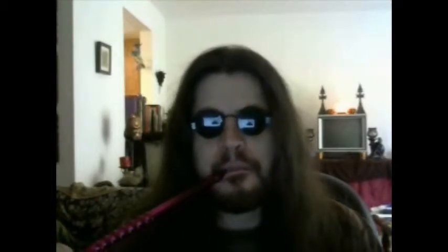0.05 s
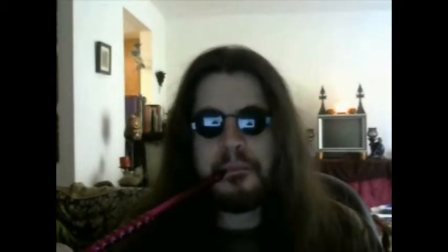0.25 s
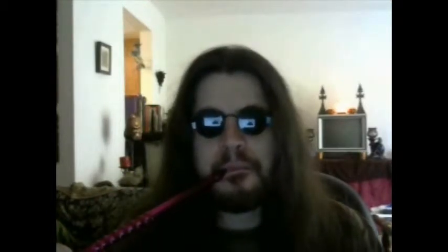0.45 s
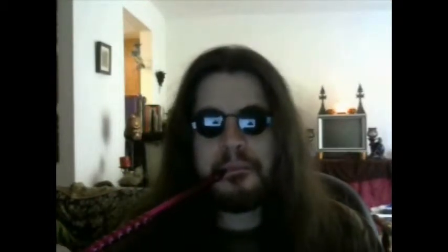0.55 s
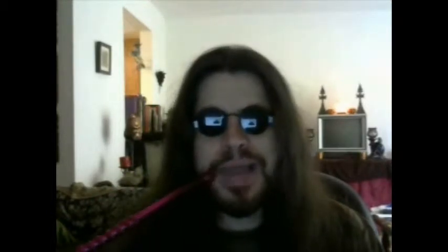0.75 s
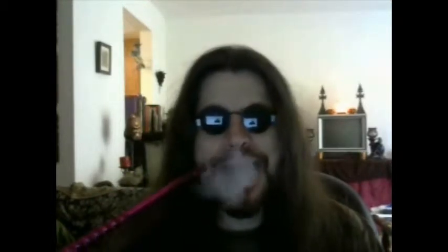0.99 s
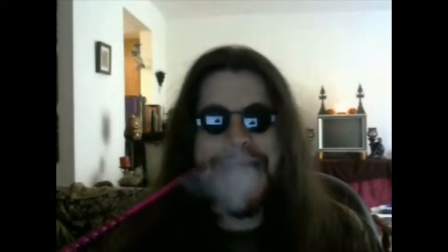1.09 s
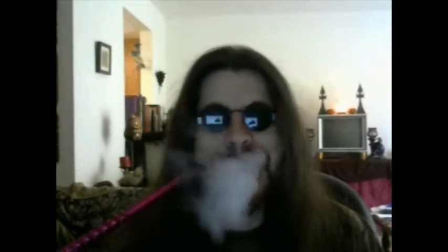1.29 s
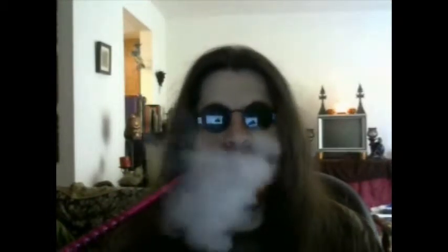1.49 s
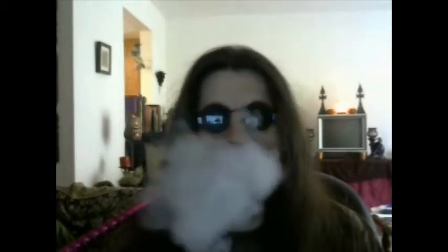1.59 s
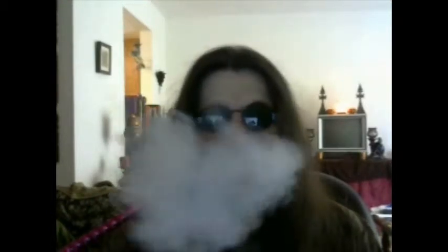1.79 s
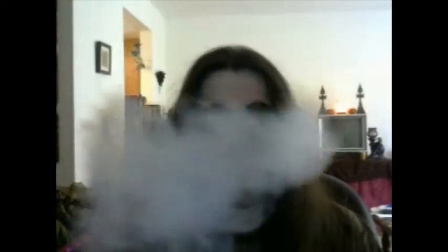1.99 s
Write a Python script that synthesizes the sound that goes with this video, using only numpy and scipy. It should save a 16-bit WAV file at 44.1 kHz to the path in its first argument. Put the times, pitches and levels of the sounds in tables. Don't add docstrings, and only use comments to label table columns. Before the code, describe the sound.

Rapid mid-pitched gurgles in a hookah vase, with low glugs, small high plops and bright spray, fade abruptly into a hushed small room; the cheap microphone slightly overloads, clicks and hisses.

```python
import sys
import numpy as np
from scipy import signal
from scipy.fft import rfft, irfft, next_fast_len
from scipy.io import wavfile
from scipy.ndimage import uniform_filter1d, map_coordinates

SR = 44100
rng = np.random.default_rng(int(sys.argv[2]) if len(sys.argv) > 2 else 0)


def voltage_ratio(decibels):
    exponent = np.asarray(decibels, float) / 20
    return 10 ** exponent


def wrap_up_sound(samples):
    columns = np.atleast_2d(samples).T
    tamed = np.clip(columns, -1, 1)
    steps = np.round(tamed * 32767).astype(np.int16)
    wavfile.write(sys.argv[1], SR, steps)


N = 90140

# start [s], peak [dB], pitch [Hz], swell [s].
BUBBLES = [(.002, -22.5, 589, .004), (.008, -18.5, 535, .009), (.056, -27, 535, .005),
           (.063, -16.5, 522, .010), (0.089, -28.5, 497, .007), (.117, -25, 530, .007),
           (.137, -28.5, 545, .006), (0.172, -20, 480, .003), (.178, -20, 569, .005),
           (0.243, -11, 520, 0.007), (.254, -31, 530, .007), (.263, -29, 500, .007),
           (0.275, -28.5, 478, .012), (.300, -37, 520, .005), (.308, -25, 525, .008),
           (.320, -34.5, 710, .010), (0.376, -31.5, 539, .008), (0.431, -19.5, 525.6, .007),
           (.456, -35.5, 480, .008), (.497, -29, 570, .005), (.504, -22, 560, .007),
           (0.519, -25, 533, .005), (.531, -14.5, 542.3, 0.013), (.546, -28.5, 526, 0.0044),
           (.571, -32.5, 531, .006), (.586, -25, 533, .008), (.603, -21.5, 524, .010),
           (.643, -26, 696, 0.0045), (.659, -23.5, 514, .007), (0.675, -37, 568, .006)]
SPRAY_SHARP = 1.7
PATCHY_DB = 4


def unit(x):
    return x / np.sqrt(np.mean(x ** 2) + 1e-20)


def along(points, hz):
    f, v = np.transpose(points)
    return np.interp(np.log(hz + 1), np.log(f + 1), v)


def wobble(rate_hz, count):
    knots = rng.standard_normal(int(count * rate_hz / SR) + 4)
    return map_coordinates(knots, [np.arange(count) * rate_hz / SR])


def filtered(x, response):
    m = next_fast_len(N + SR // 2)
    return irfft(rfft(x, m) * response(np.fft.rfftfreq(m, 1 / SR)), m)[..., :N]


def highpass(hz):
    return lambda f: (1j * f / (hz + 1j * f)) ** 2


def resonances(peaks, widen):
    def response(f):
        total = 0
        for k, (centre_hz, width_hz, db) in enumerate(peaks):
            damping = 1j * f * width_hz * widen
            total = total + (-1) ** k * voltage_ratio(db) * damping / (centre_hz ** 2 - f * f + damping)
        return total
    return response


def swell(rise_s, power):
    u = np.arange(SR // 5) / SR / max(rise_s, 1e-3)
    return (u * np.exp(1 - u)) ** power


def add(track, s, x):
    track[round(s * SR):][:len(x)] += x


def singing(rows, rise, wander):
    lumpy_db, sharp = 1.6, 2.66
    out, t = np.zeros(N), np.arange(SR // 5) / SR
    for s, db, hz, rise_s in rows:
        climb = rise * (t / rise_s - 1) / (1 + t / rise_s / 4)
        pitch_hz = hz * (1 + climb + wander * wobble(66, len(t)))
        size = voltage_ratio(db + lumpy_db * wobble(130, len(t))) * swell(rise_s, sharp)
        add(out, s, size * np.sin(2 * np.pi * np.cumsum(pitch_hz) / SR))
    return out


def patchy():
    z = signal.stft(rng.standard_normal(N), nperseg=256)[2]
    field = rng.standard_normal(z.shape)
    field = uniform_filter1d(uniform_filter1d(field, 5, 0), 7, 1)
    return signal.istft(z * voltage_ratio(PATCHY_DB * unit(field)), nperseg=256)[1][:N]


def bubbles():
    # start [s], peak [dB], pitch [Hz], swell [s].
    stragglers = [
        (.690, -49, 560, 0.0082),
        (.716, -59, 800, .006),
        (.733, -56.5, 480, 0.0091),
        (0.76, -58.5, 500, .010),
        (.715, -60, 1200, 0.0097),
        (0.25, -63, 730, .012),
        (.010, -34, 350, 0.0042),
        (0.52, -38, 340, 0.012),
    ]
    # start [s], peak [dB], pitch [Hz], swell [s].
    plops = [(.000, -30.5, 800, 0.0034), (.072, -27.5, 720, 0.0047), (.112, -31.5, 720, 0.0073),
             (.178, -27, 780, 0.0084), (.245, -31.5, 723, 0.0091), (.303, -32, 391, 0.0089),
             (.311, -36, 753, 0.0087), (.500, -32.5, 693, 0.015), (.642, -34.5, 1207, 0.0049),
             (.675, -35, 720, 0.0086), (.693, -47.5, 792, 0.01), (.260, -41.5, 1013, 0.0097),
             (.430, -43, 1317, 0.0085), (.003, -36.5, 1296, 0.0076), (.558, -49.5, 1044, 0.013)]
    return singing(BUBBLES + stragglers + plops, rise=0.008, wander=0.011)


def spray():
    # start [s], peak [dB], swell [s], brightness above 4.5 kHz [dB].
    splashes = [(.000, -37.5, 0.0068, -4), (0.063, -33, 0.012, -1), (0.126, -51, 0.01, -5),
                (0.176, -30.5, 0.011, -13), (.245, -33, 0.013, -7.5), (0.314, -45.5, 0.012, 2),
                (0.375, -51, 0.015, -3), (0.426, -41, 0.013, 0), (0.503, -48, 0.014, 5),
                (0.543, -40, 0.0097, -5), (0.559, -54.5, 0.0079, 6.5), (0.599, -50.5, 0.012, 7.5),
                (0.64, -58.5, 0.031, -6), (0.695, -68, 0.0063, -5), (.803, -68, 0.0035, 8.5)]
    # centre [Hz], width [Hz], level [dB].
    low_peaks = [(2173, 47, 5.5), (2920, 60, 0.5), (3390, 120, 1), (3580, 55, 3.5), (4280, 150, -3.5)]
    # frequency [Hz], density [dB per Hz].
    high_colour = [(4000, -32), (4500, -7.5), (5900, 5), (6500, 1.5), (7300, -4), (8500, -16.5),
                   (10000, -30), (11500, -54.5)]
    level_db, grainy_db = -11, 1.5
    low_size, high_size = np.zeros(N), np.zeros(N)
    for s, db, rise_s, bright_db in splashes:
        envelope = swell(rise_s, SPRAY_SHARP)
        add(low_size, s, voltage_ratio(db) * envelope)
        add(high_size, s, voltage_ratio(db + bright_db) * envelope)
    ringing = resonances(low_peaks, widen=2.7)

    def low_band(f):
        return ringing(f) / (1 + (2230 / (f + 1)) ** 40) / (1 + (f / 4300) ** 12)

    low = unit(filtered(patchy(), low_band)) * voltage_ratio(grainy_db * wobble(150, N))
    high = unit(filtered(patchy(), lambda f: voltage_ratio(along(high_colour, f))))
    high = high * voltage_ratio(grainy_db * wobble(280, N))
    return voltage_ratio(level_db) * (low_size * low + high_size * high)


def floor():
    # frequency [Hz], density [dB per Hz].
    hiss = [(30, -22), (90, -15), (210, -3), (430, -10), (750, -8), (2000, -21.5), (5000, -29), (6900, -21)]
    # frequency [Hz], level [dB].
    hum = [
        (59, -83),
        (118, -88),
        (175, -85),
        (762, -83),
    ]
    hiss_db, fall, knee_hz = -68.3, 6.3, 8600
    last_hz = hiss[-1][0]

    def colour(f):
        slope = np.clip(f / last_hz, 1, knee_hz / last_hz) ** fall
        return voltage_ratio(along(hiss, f)) / slope / np.maximum(f / knee_hz, 1) ** 4.5

    out = unit(filtered(rng.standard_normal(N), colour)) * voltage_ratio(hiss_db + 0.88 * wobble(8.8, N))
    t = np.arange(N) / SR
    for hz, db in hum:
        out += voltage_ratio(db + 3.034 * wobble(3.4, N)) * np.sin(2 * np.pi * hz * t)
    return out


def clicks():
    # start [s], step [dB].
    step_rows = [
        (0, -24),
        (.2535, -35),
        (.6208, -19),
    ]
    decay_s, low_hz = 0.0021, 244
    steps = np.zeros(N)
    for s, db in step_rows:
        add(steps, s, -voltage_ratio(db) * np.exp(-np.arange(SR // 100) / SR / decay_s))
    return filtered(steps, highpass(low_hz))


def glugs():
    # start [s], peak [dB], pitch [Hz], swell [s].
    glug_rows = [(0.001, -29.5, 235, 0.0082), (0.056, -31.5, 237, 0.01), (0.134, -36, 250, 0.013),
                 (0.171, -32, 227, 0.0089), (0.246, -34.5, 277.3, 0.0094), (0.310, -35.5, 210, 0.0091),
                 (0.371, -34.5, 244, 0.013), (0.423, -27, 194, 0.01), (0.445, -31.5, 190, 0.0097),
                 (0.505, -36, 217, 0.012), (0.543, -27.5, 232, 0.011), (0.585, -31, 230, 0.011),
                 (0.623, -35.5, 246, 0.014), (0.646, -38, 232.5, 0.0113), (0.702, -36.5, 153, 0.0095)]
    return singing(glug_rows, rise=0.02, wander=0.027)


def mist():
    # start [s], rms [dB].
    puffs = [
        (.002, -64),
        (.068, -64),
        (.178, -48.5),
        (0.249, -66),
        (0.429, -64.5),
        (.600, -64.5),
    ]
    low_hz, high_hz, swell_s = 6600, 10070, 0.0086
    size = np.zeros(N)
    for s, db in puffs:
        add(size, s, voltage_ratio(db) * swell(swell_s, SPRAY_SHARP))

    def band(f):
        return 1 / (1 + (low_hz / (f + 1)) ** 12) / (1 + (f / high_hz) ** 40)

    return size * unit(filtered(patchy(), band))


def slosh():
    # centre [Hz], width [Hz], level [dB].
    vase = [(196, 84, -1.5), (533, 56, 3), (720, 71, -3), (1018, 70, -11.5), (1180, 50, -19.5),
            (1330, 37, -15), (1554, 76, -15)]
    level_db, t60_s, rise_s = -8.5, 0.084, 0.0035
    size, t = np.zeros(N), np.arange(SR // 4) / SR
    for s, db, *_ in BUBBLES:
        add(size, s, voltage_ratio(db - 60 * t / t60_s) * (1 - np.exp(-t / rise_s)))
    modes = resonances(vase, widen=2.2)

    def body(f):
        return modes(f) / (1 + (f / 1750) ** 20)

    noise = rng.standard_normal(N)
    return voltage_ratio(level_db) * filtered(noise * size, body) / np.std(filtered(noise, body))


def swarm():
    count, level_db, centre_hz, spread, cycles, delay_s = 7, -22, 890, 0.39, 2.1, 0.017
    out, t = np.zeros(N), np.arange(SR // 25) / SR
    for s, db, *_ in BUBBLES:
        lates = rng.exponential(1, count)
        sizes_db = rng.normal(0, 0.83, count)
        keys = rng.normal(0, 1, count)
        for late, size_db, key in zip(lates, sizes_db, keys):
            hz = centre_hz * np.exp(spread * np.clip(key, -1.5, 1.6))
            u = t * hz / cycles
            envelope = 3 * u * np.exp(1 - 3 * u)
            tone = np.sin(2 * np.pi * hz * t * (1 + 0.058 * u))
            add(out, s + delay_s * late, voltage_ratio(db + level_db + size_db - 6.5 * late) * envelope * tone)
    return out


def stem():
    # start [s], peak [dB], swell [s].
    rings = [(0.0034, -36, 0.0057), (0.0752, -40, 0.008), (0.1338, -44, 0.013), (0.1735, -29, 0.01),
             (0.207, -43.5, 0.0031), (0.253, -36.5, 0.013), (0.319, -49.5, 0.0093), (0.377, -49.5, 0.008),
             (0.392, -49, 0.013), (0.4296, -28.5, 0.0099), (0.449, -37, 0.0087), (0.508, -39.5, 0.0074),
             (0.5496, -29.5, 0.011), (0.6033, -33.5, 0.011), (0.6445, -40.5, 0.0055)]
    stem_hz = 1550
    return singing([(s, db, stem_hz, rise_s) for s, db, rise_s in rings], rise=0, wander=0.016)


def beads():
    # start [s], peak [dB], pitch [Hz], swell [s].
    bead_rows = [(0.009, -32, 1030, 0.009), (0.029, -38.5, 1007, 0.0056), (0.064, -36, 1050, 0.007),
                 (0.082, -34, 1035, 0.010), (0.116, -44.5, 905, 0.013), (0.132, -33.5, 1015, 0.0087),
                 (0.173, -32, 1215, 0.0031), (0.197, -33.5, 1040, 0.009), (0.321, -46.5, 986, 0.0097),
                 (0.397, -53, 1006, 0.005), (0.504, -41.5, 1180, 0.0064), (0.551, -60, 880, 0.0081),
                 (0.598, -40.5, 1280, 0.0037), (0.618, -35.5, 1050, 0.009), (0.644, -37, 951, 0.01),
                 (0.691, -42.5, 859, 0.0028)]
    return singing(bead_rows, rise=0.02, wander=0.011)


def room(x):
    # frequency [Hz], t60 [s].
    decay = [(200, 0.12), (1500, 0.089), (8000, 0.19)]
    hz, t, z = signal.stft(rng.standard_normal(SR // 2), SR, nperseg=256)
    tail = signal.istft(z * voltage_ratio(-60 * t / along(decay, hz)[:, None]), SR, nperseg=256)[1]
    return signal.fftconvolve(np.pad(x, (300, 0)), tail / np.linalg.norm(tail))[:N]


def skipped(x):
    at_s, skip_s, fade_s = 0.2535, 0.00097, 0.0007
    after = np.clip((np.arange(N) / SR - at_s) / fade_s / 2 + 0.5, 0, 1)
    return (1 - after) * x + after * np.roll(x, -round(skip_s * SR), axis=-1)


def scene():
    inside_top_hz, mic_low_hz, room_db = 1910, 118.2, -12
    inside = bubbles() + glugs() + beads() + stem() + swarm() + slosh()
    pipe = filtered(inside, lambda f: 1 / (1 + (f / inside_top_hz) ** 24))
    pipe = pipe + spray() + mist()
    pipe = filtered(skipped(pipe), highpass(mic_low_hz))
    return (pipe + voltage_ratio(room_db) * room(pipe) + floor())[None]


def top_cut(x):
    return signal.sosfilt(signal.butter(12, 15820, fs=SR, output="sos"), x)


def record(dry):
    top = 0.3
    overloaded = dry / (1 + np.abs(dry / top) ** 4) ** (1 / 4)
    return top_cut(overloaded + clicks())


dry = scene()
out = record(dry)
wrap_up_sound(out)
```